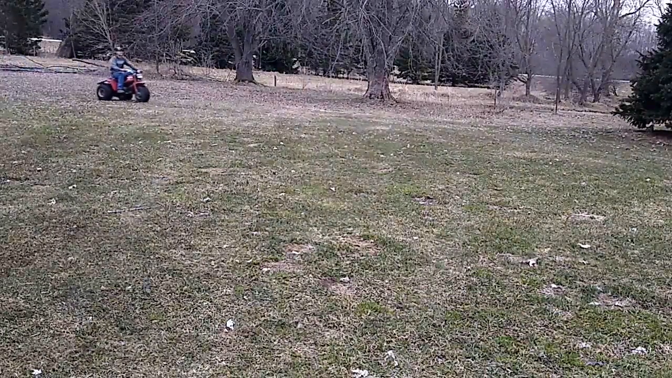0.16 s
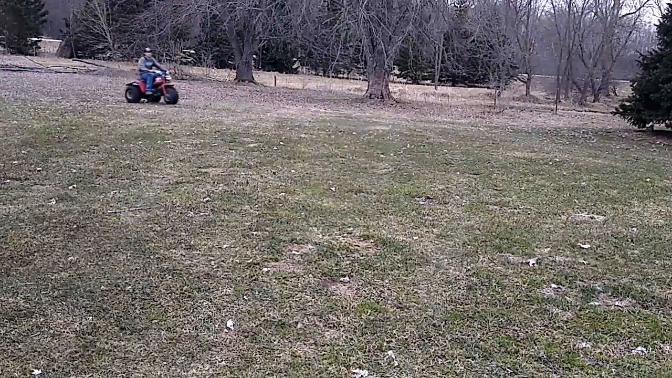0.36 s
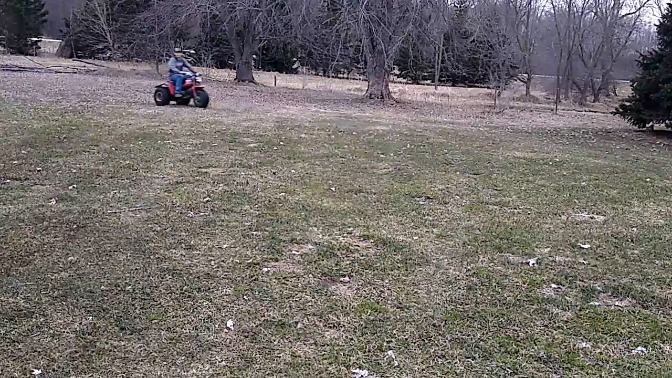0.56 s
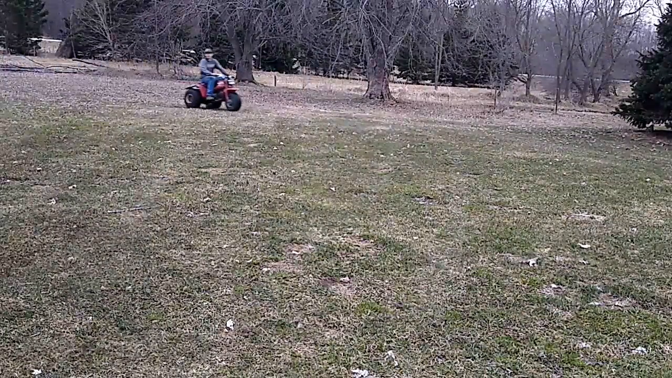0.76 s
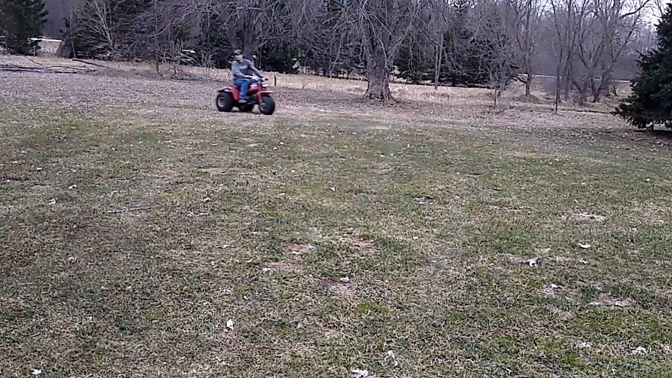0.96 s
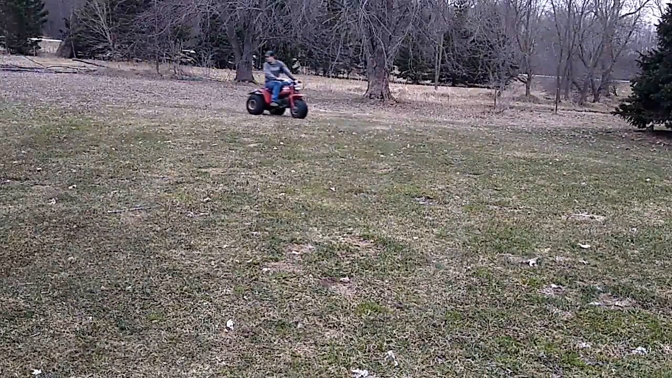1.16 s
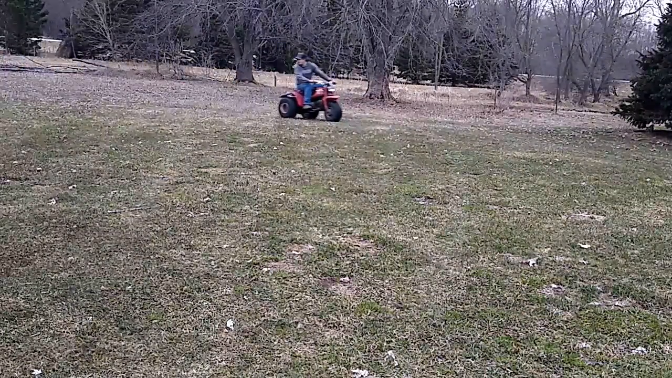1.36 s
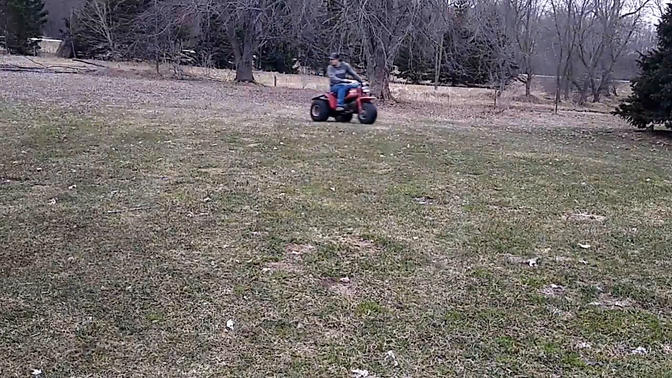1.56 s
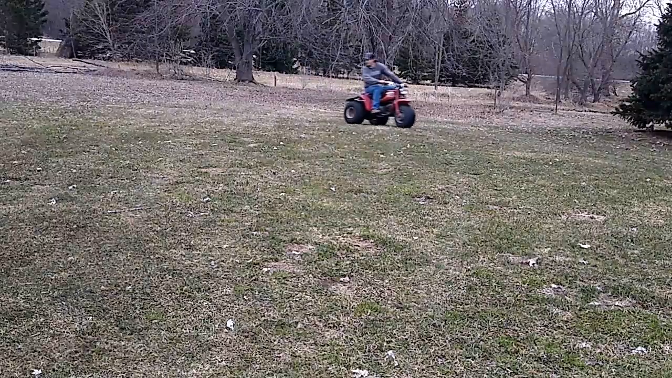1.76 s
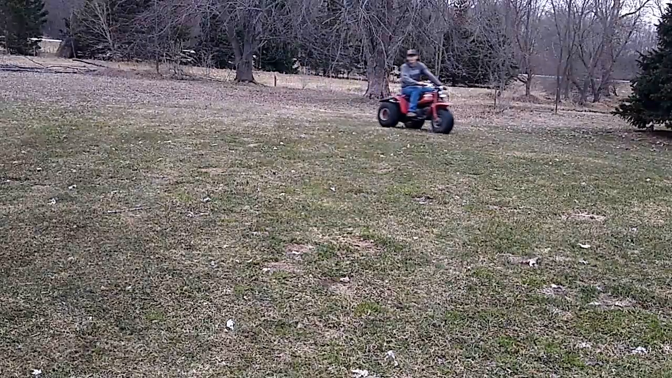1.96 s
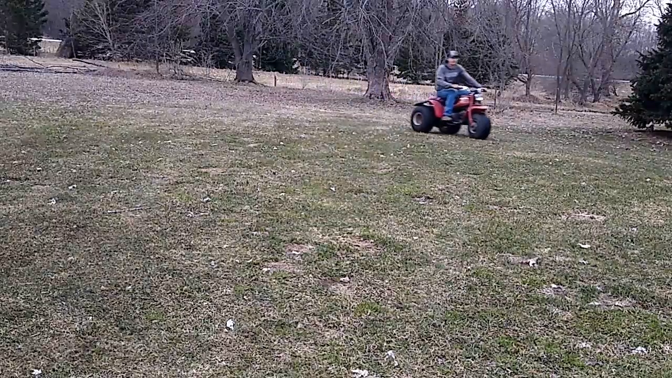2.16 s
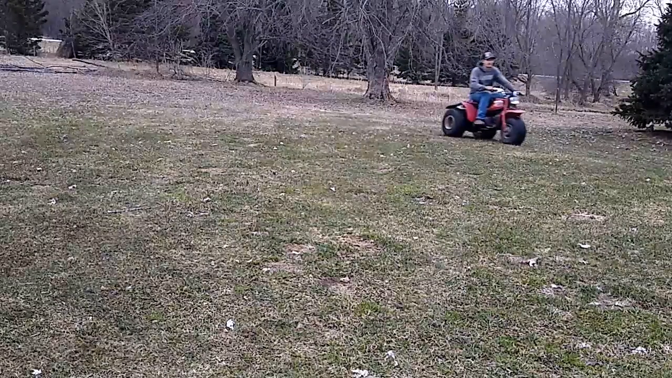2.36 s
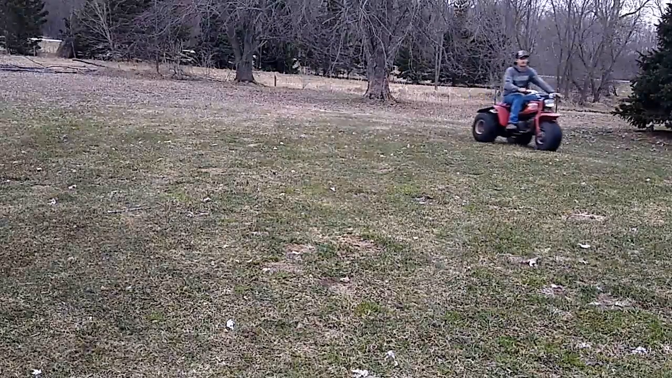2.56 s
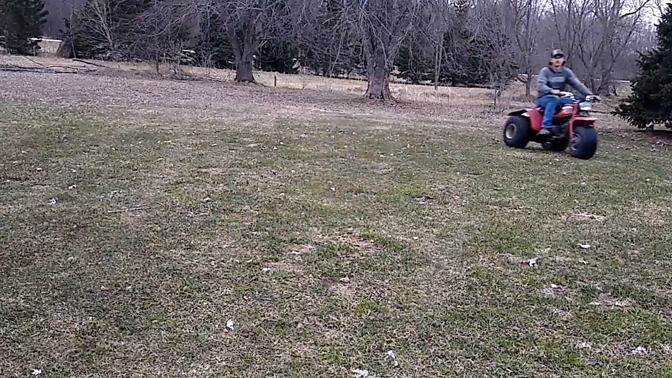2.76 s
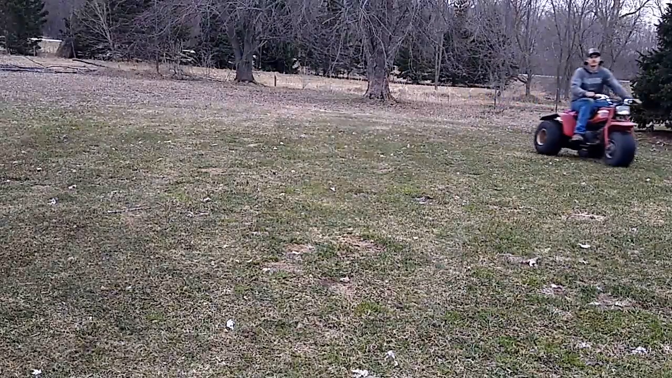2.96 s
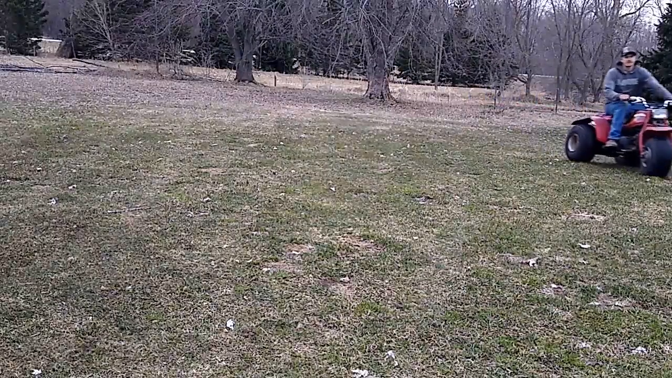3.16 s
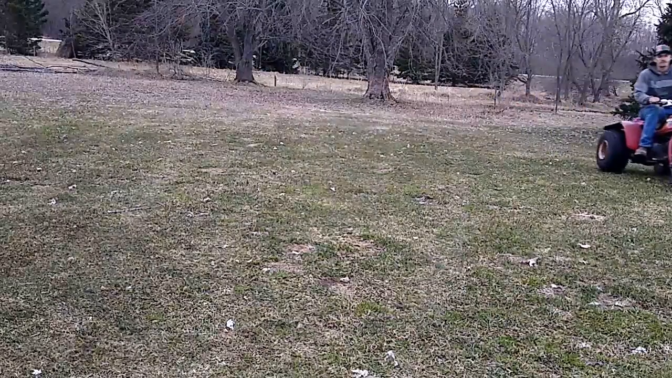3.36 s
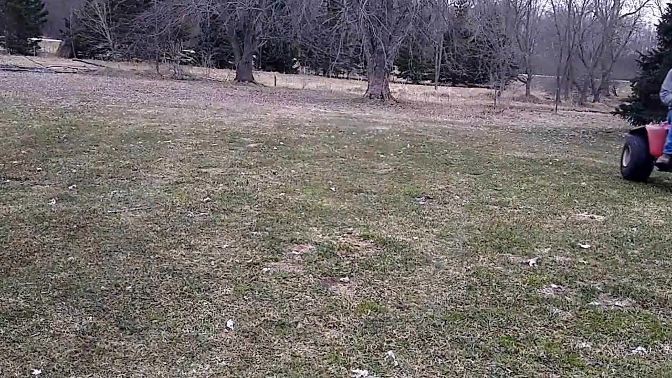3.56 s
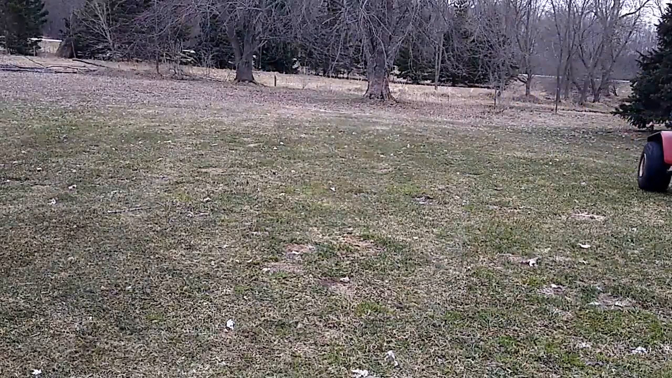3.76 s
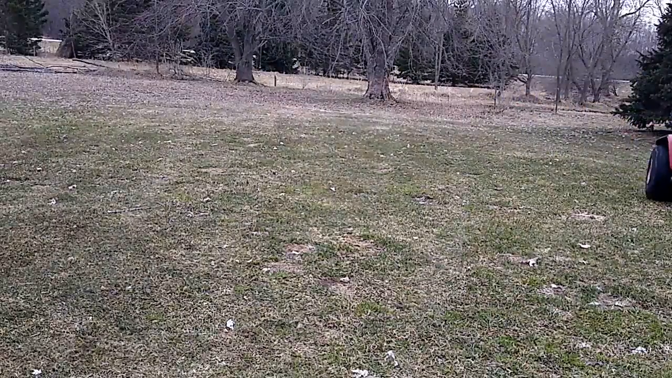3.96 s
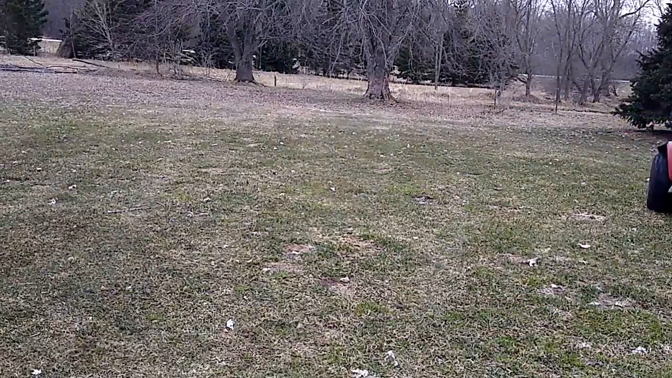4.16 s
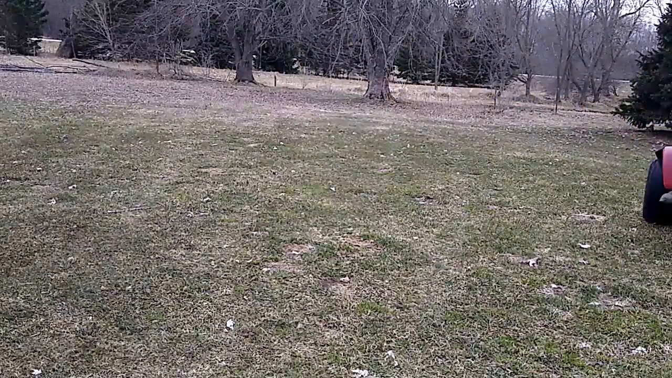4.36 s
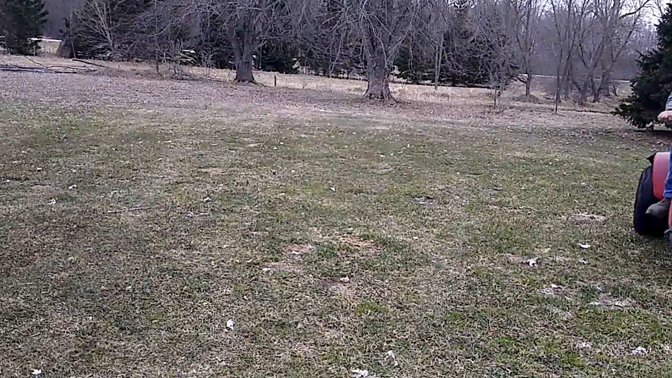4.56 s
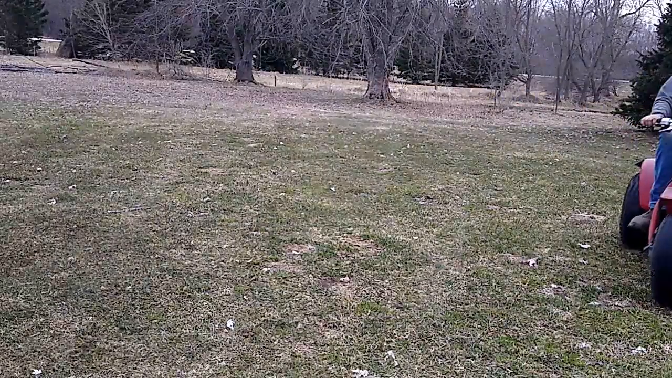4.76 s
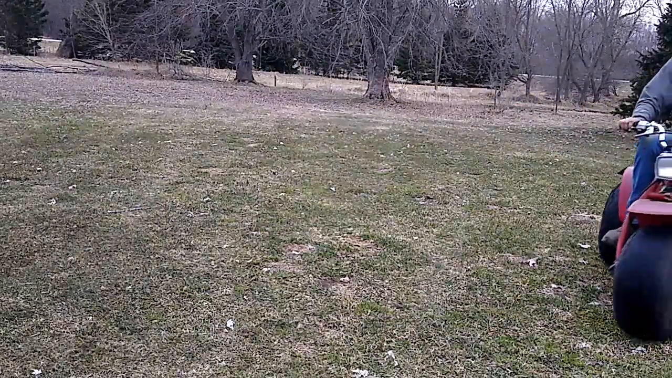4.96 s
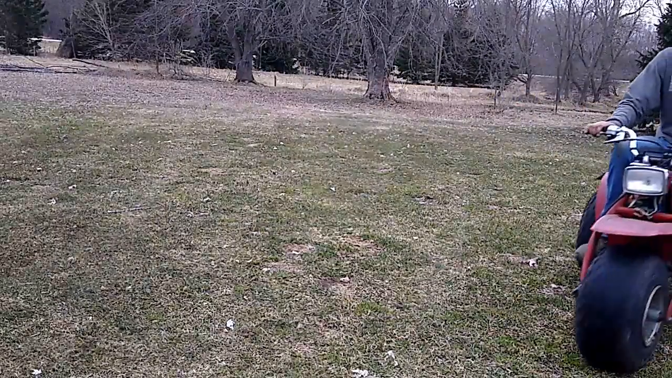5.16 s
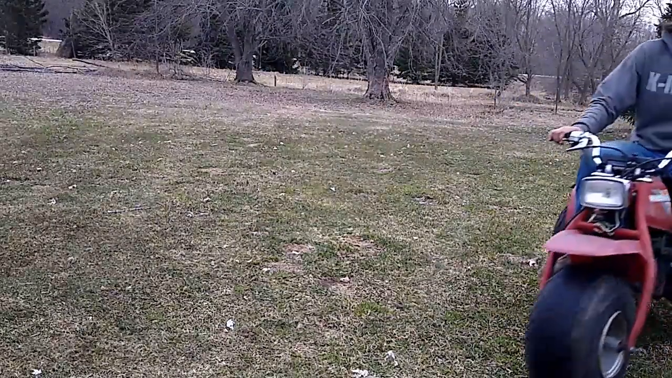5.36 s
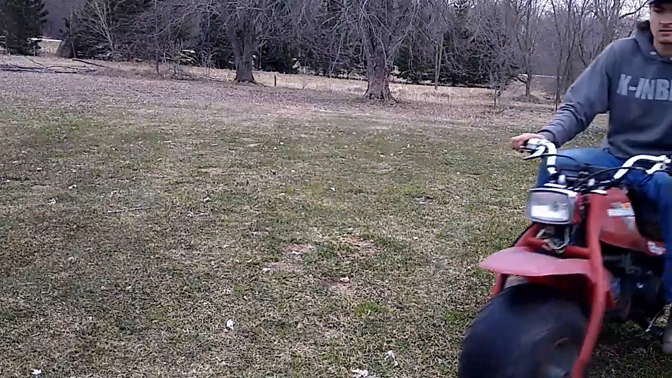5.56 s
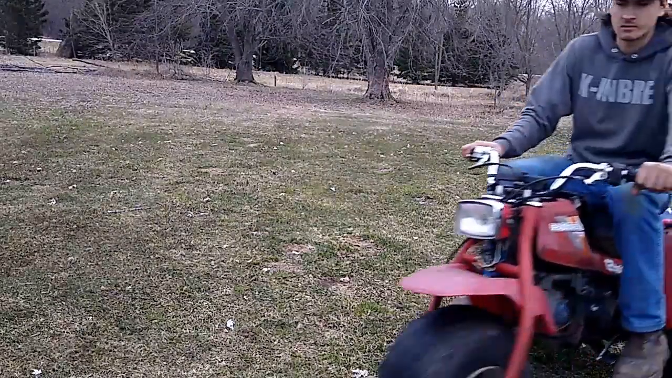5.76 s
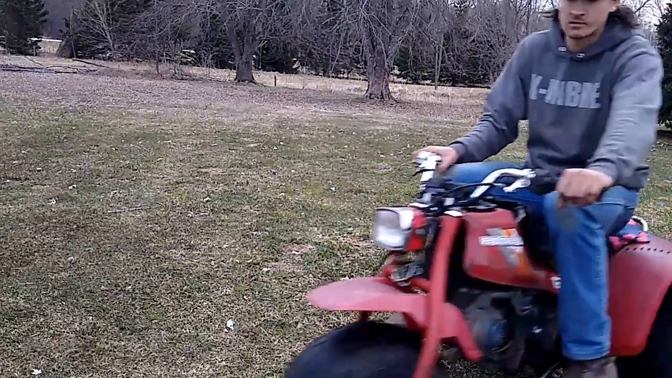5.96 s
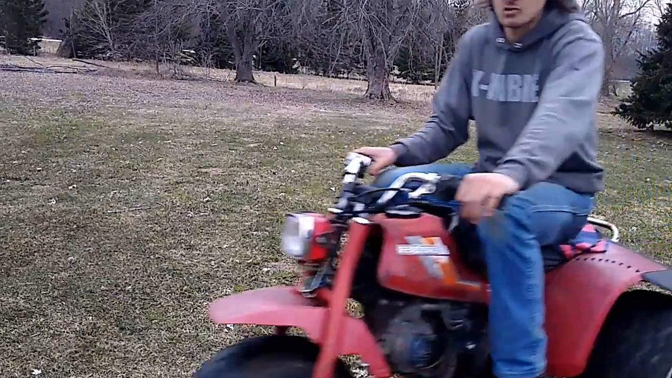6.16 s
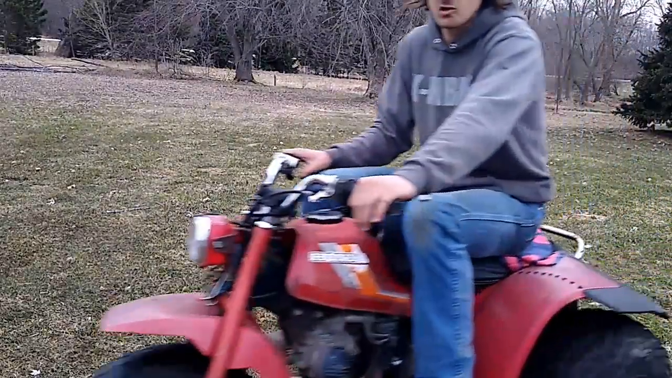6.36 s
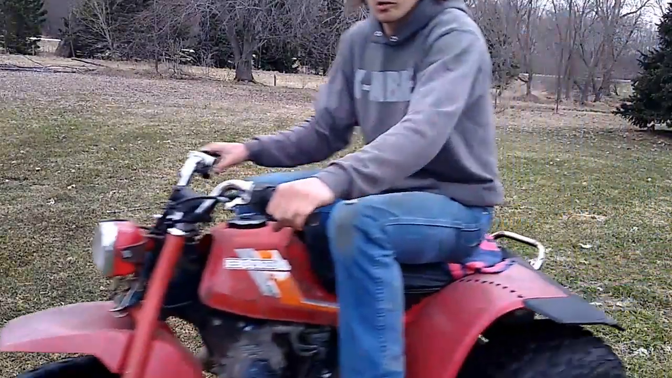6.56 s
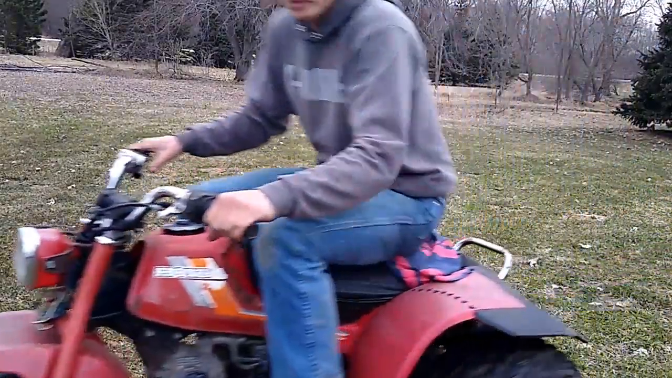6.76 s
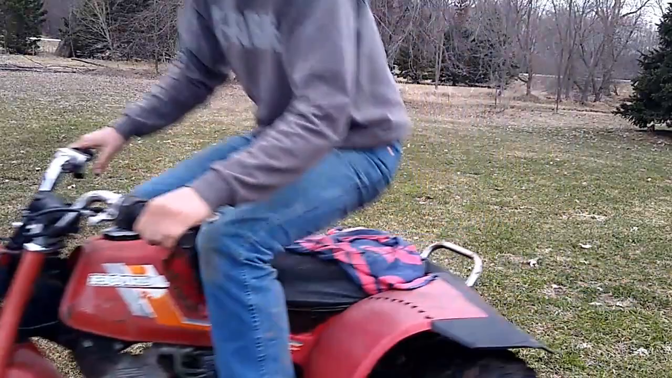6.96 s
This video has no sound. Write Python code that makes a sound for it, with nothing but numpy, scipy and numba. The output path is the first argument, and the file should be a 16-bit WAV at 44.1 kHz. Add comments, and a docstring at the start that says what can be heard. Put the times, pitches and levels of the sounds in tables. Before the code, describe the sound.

A three-wheeled all-terrain vehicle rides from left to right across an open lawn, its single-cylinder engine barking through short throttle blips with metallic ticking and a few knocks. It slows to a low chug as it turns on the right, then rolls back close past the microphone, growing louder. A loose panel clanks lightly near the end, over a faint low rumble of outdoor air.

```python
"""A single-cylinder four-stroke three-wheeler crosses a lawn from left to right, blipping the throttle.
Each firing rings the silencer; valve gear and chains rattle the finned case every cycle; the cylinder
knocks under load. Around 4 s the engine slows and the machine turns, then rolls back past a phone,
bumps striking a loose panel from 5.8 s. Throughout, low air rumble and a short outdoor scatter;
the phone's two microphone ports hear the machine at slightly different times."""
import sys
import numpy as np
from scipy import signal
from scipy.fft import rfft, irfft
from scipy.io import wavfile
from scipy.ndimage import uniform_filter1d, map_coordinates
from numba import njit

SR = 44100
rng = np.random.default_rng(int(sys.argv[2]) if len(sys.argv) > 2 else 0)


def persist_wave(psi):
    """Save psi, clipped to +-1, as 16-bit WAV."""
    counts = np.round(np.clip(psi, -1, 1) * 32767).astype(np.int16)
    wavfile.write(sys.argv[1], SR, np.atleast_2d(counts).T)


N = 308700
TIME_S = np.arange(N) / SR
BINS_HZ = np.maximum(np.fft.rfftfreq(N, 1 / SR), 1)

# Machine as it turns: (time [s], pipe pitch [Hz], pipe echo [0-1], relative intake gulp [dB],
# spread of its parts across the ports [us], facing [0 side on and far, 1 head on and near])
ASPECT = [(0, 191, 0.8, -61, 17, 0), (1, 226, 0.97, -4, 1.3, 0), (1.9, 183, 0.45, 0, 19, 0.14),
          (2.6, 182, 0.57, -8, 1.1, 0.075), (3.45, 189, 0.62, -33, 20, 0.42), (4.1, 177, 1, 4, 33, 0.72),
          (4.7, 150, 0.92, 1, 27, 0.94), (5.5, 151, 1, 9, 41, 0.82), (6.2, 153, 0.98, 4, 51, 0.77),
          (7, 156, 0.64, 2.5, 51, 0.61)]
# Loudness, throttle shut: (time [s], exhaust thump [dB], running gear [dB])
IDLE_LEVELS = [(0, -33, -32), (.6, -31, -30), (1.2, -30.5, -28.5), (1.8, -30, -28.5), (2.05, -32, -28),
               (2.3, -32, -28), (2.6, -31, -28.5), (3.0, -28.5, -28), (3.45, -30.5, -27.5),
               (3.62, -29, -30), (3.72, -34, -29.5), (3.82, -29.5, -28.5), (3.92, -36, -30.5),
               (4.01, -30, -31.5), (4.07, -38.5, -33), (4.28, -35, -32.5), (4.4, -33.5, -34.5),
               (4.6, -32.5, -31), (4.8, -31, -30.5), (5.5, -27, -25.5), (6.1, -25.5, -20.5),
               (6.65, -23.5, -16.5), (7, -24, -16)]
# Case resonances: (pitch [Hz], width [Hz], side on [dB], head on [dB])
CASE_MODES = [(1840, 390, -22, 2.5), (2643, 84, -12, 2), (3440, 220, -16, -6), (4015, 92, -8.5, -30),
              (4390, 45, -8.5, -13), (2860, 47, -46, 8), (3030, 3400, -16, -3.5)]
# Fin resonances: (pitch [Hz], width [Hz], side on [dB], head on [dB])
FIN_MODES = [(5066, 40, -1, 0), (5340, 85, -3, -2.5), (5680, 52, 0.5, -3), (6190, 32, 5, 7),
             (6970, 36, 2, -11), (7850, 180, -4.5, 0), (8860, 560, -13, 1.5), (9800, 120, -13, -7),
             (10430, 110, -10, -4), (11360, 440, -22.5, -3), (12000, 150, -6, 2), (13000, 330, -7, -5.5),
             (14000, 300, -17, -4)]


def undb(db):
    """dB to gain."""
    return 10 ** (np.asarray(db) / 20)


def unit(x):
    """Scale to rms 1."""
    return x / np.sqrt(np.mean(x ** 2))


def steady(x):
    """Divide out slow level changes."""
    return x / np.sqrt(uniform_filter1d(uniform_filter1d(x ** 2, size=6000), size=6000) + 1e-12)


def curves(table):
    """Each column after time, at every sample."""
    time_s, *columns = np.transpose(table)
    return [np.interp(TIME_S, time_s, column) for column in columns]


def walk(rate_hz, count=1):
    """Slewed random steps, spread near 1."""
    hold = int(SR / rate_hz)
    steps = np.repeat(rng.standard_normal((count, N // hold + 1)), hold, axis=1)
    return uniform_filter1d(steps, hold)[:, :N]


def ring(x, modes):
    """Parallel resonances: (pitch [Hz], width [Hz], level [dB])."""
    response = sum(undb(db) * 1j * BINS_HZ * width_hz / (hz ** 2 - BINS_HZ ** 2 + 1j * BINS_HZ * width_hz)
                   for hz, width_hz, db in modes)
    return irfft(rfft(x) * response, N)


def colour(x, shape):
    """Broad spectral shape: (frequency [Hz], level [dB])."""
    hz, db = np.transpose(shape)
    return irfft(rfft(x) * undb(np.interp(np.log(BINS_HZ), np.log(hz), db)), N)


@njit
def band(x, hz, width_hz):
    """State-variable band-pass, moving centre."""
    out, band_state, low_state = np.empty(len(x)), 0., 0.
    for i in range(len(x)):
        g, damping = np.tan(np.pi * hz[i] / SR), width_hz[i] / hz[i]
        v = (band_state + g * (x[i] - low_state)) / (1 + g * (g + damping))
        band_state, low_state = 2 * v - band_state, low_state + 2 * g * v
        out[i] = damping * v
    return out


def turned(apply_filter, x, table):
    """Blend side-on and head-on filters (last two columns) by facing."""
    facing = curves(ASPECT)[4]
    side_on, head_on = (unit(apply_filter(x, np.delete(table, k, axis=1))) for k in (-1, -2))
    return (1 - facing) * side_on + facing * head_on


def throttle(response_s=.061):
    """Throttle opening, smoothed by the engine's response time."""
    # (opens [s], shuts [s], opening [0-1])
    pulls = [(-.1, 0.992, 0.84), (1.291, 1.499, 0.8), (1.619, 1.877, 0.97), (2.27, 2.45, 0.24),
             (2.442, 2.62, 0.51), (2.618, 3.479, 0.83), (3.94, 3.985, 0.24), (4.09, 4.48, 0.16),
             (4.492, 4.727, 0.61), (4.693, 7.1, 0.28)]
    lever = sum(opening * ((TIME_S >= on_s) & (TIME_S < off_s)) for on_s, off_s, opening in pulls)
    return np.clip(uniform_filter1d(lever, int(response_s * SR)), 0, 1.2)


def puff(cycles, firing_hz, at_s, width_s, scatter_db):
    """One smooth gas push per cycle, at_s after firing, random size."""
    cycle = np.round(cycles - at_s * firing_hz)
    since_s = (cycles - cycle) / firing_hz - at_s
    size = undb(scatter_db * rng.standard_normal(int(cycles[-1]) + 3))[cycle.astype(int) + 1]
    return size * np.exp(-.5 * (since_s / width_s) ** 2)


def exhaust_thump(cycles, firing_hz):
    """Throttle open: sharp puff, echoing in the pipe. Shut: a suck, then a soft puff, weak echo."""
    # Silencer can, heard head on under load: (pitch [Hz], width [Hz], level [dB])
    can_mode = (74, 24, 3)
    pipe_hz, echo, gulp_db, _, facing = curves(ASPECT)
    load = np.clip(throttle() / .28, 0, 1)  # sharpest from 0.28 open
    width_s = .0018 - .00095 * load
    late_s = .00039 + .001 * (1 - load)
    suck = .54 * (1 - load) * puff(cycles, firing_hz, late_s - .0035, width_s, .83)
    blast = puff(cycles, firing_hz, late_s, width_s, .17) - suck
    reflection = echo * (.24 + .5 * load) * puff(cycles, firing_hz, late_s + 1 / pipe_hz, width_s, .73)
    gulp = undb(gulp_db - 8) * puff(cycles, firing_hz, .01466, .00061, .66)
    push = (blast + reflection - gulp) * (1 + .14 * walk(400)[0])
    boom = load * facing ** 2 * ring(blast, [can_mode])
    thump = band(push, hz=174 + 79 * load - 116 * facing, width_hz=160 + 244 * load)
    return steady(boom + thump + .034 * walk(250)[0])


def silencer_bark(cycles, firing_hz, jitter_s=.0004):
    """Two chambers in series: each bark swells briefly, then dies."""
    # First chamber: (pitch [Hz], width [Hz], side on [dB], head on [dB])
    chamber_modes = [(245.6, 22, -10.5, -2.5), (345, 27.5, 6, 3), (432.2, 74, 2.5, -10.5)]
    uneven = cycles + firing_hz * jitter_s * walk(25)[0]
    crack = puff(uneven, firing_hz, .0002, .0006, 1.2) + 1.1 * puff(uneven, firing_hz, .0047, .0006, 2.2)
    crack += .09 * rng.standard_normal(N)
    return steady(ring(turned(ring, crack, chamber_modes), [(408, 110, 0)]))


def exhaust(cycles, firing_hz):
    """Thump plus bark; the bark follows the throttle, nearly gone when shut and head on."""
    opening, facing = throttle(), curves(ASPECT)[4]
    level_db = curves(IDLE_LEVELS)[0] + 5 * opening
    bark_gain = undb(-4.5) * (opening + undb(-4 - 19.5 * facing))
    thump, bark = exhaust_thump(cycles, firing_hz), silencer_bark(cycles, firing_hz)
    return undb(level_db) * (thump + bark_gain * bark)


def ticks(cycles, rough_db, phases, widths, bursts_db):
    """Dense uneven ticks, bunched within the cycle. Rows: centre, front, rear."""
    gate = 1
    for phase, width, db in zip(phases, widths, bursts_db):
        cycle = np.round(cycles - phase)
        size = rng.exponential(size=int(cycles[-1]) + 2)[cycle.astype(int)] ** .3
        gate = gate + (undb(db) - 1) * np.exp(-.5 * ((cycles - phase - cycle) / width) ** 2) * size
    return gate * rng.standard_normal((3, N)) * undb(rough_db * walk(900, count=3))


def taps(cycles, per_cycle=6, rise_s=.0018, decay_s=.004, scatter_db=1.3, detune=.04):
    """Parts tap after each firing, each ringing one case or fin mode. Rows: centre, front, rear."""
    modes, facing = np.array(CASE_MODES[1:6] + FIN_MODES), curves(ASPECT)[4]
    out, t = np.zeros((3, N + 1500)), np.arange(1500) / SR
    for k, (when, note, size, place) in enumerate(rng.random((int(cycles[-1]) * per_cycle, 4))):
        phase = .16 + .22 * (2 * when - 1)
        i = min(np.searchsorted(cycles, k // per_cycle + phase), N - 1)
        mode_hz, _, side_db, head_db = modes[int(note * len(modes))]
        db = .55 * (side_db + facing[i] * (head_db - side_db)) - scatter_db * np.log(1 - size)
        hz = mode_hz * (1 + detune * (2 * (3 * place % 1) - 1))
        ping = np.sin(2 * np.pi * hz * t) * np.exp(-t / decay_s) * np.tanh(t / rise_s)
        out[int(3 * place), i:i + 1500] += undb(db) * ping
    return undb(2.5) * out[:, :N]


def running_gear(cycles):
    """Valves, chain and gears ring frame, case and fins; louder when near and under load."""
    # Noise bursts: (phase after firing [cycles], width [cycles], fins [dB], case [dB])
    bursts = [(0, 0.051, 4.5, 1.5), (.24, 0.023, 7, 2.5), (.49, 0.066, -3, -0.5), (.8, 0.048, 0, 3.5)]
    # Frame resonances: (pitch [Hz], width [Hz], side on [dB], head on [dB])
    frame_modes = [(540, 27.6, 15, 8), (643, 117, 17, 7), (750, 85, -51, 0), (855, 88, -43, 8),
                   (1020, 73, 2, 4.5)]
    # Hiss under the fins: (frequency [Hz], side on [dB], head on [dB])
    hiss_shape = [(2040, -23, -50), (4800, -9.5, -8.5), (6470, -3, -2.5), (8300, -2, -3), (10600, -3, -3),
                  (12500, -8, -4), (13600, -15, -8.5), (15400, -12.5, -9.5)]
    phases, widths, fins_db, clatter_db = np.transpose(bursts)
    frame_drive = ring(ticks(cycles, 5.1, phases, widths, 1.5 * clatter_db), [(700, 15000, 0)])
    frame = turned(ring, frame_drive, frame_modes)
    case = turned(ring, ticks(cycles, 1.9, phases, widths, clatter_db), CASE_MODES)
    fins = turned(ring, ticks(cycles, 8.9, phases, widths, fins_db), FIN_MODES)
    hiss = turned(colour, ticks(cycles, .79, phases, widths, fins_db), hiss_shape)
    treble = unit(undb(-3.5) * fins + hiss) + taps(cycles)
    idle_db, facing, opening = curves(IDLE_LEVELS)[1], curves(ASPECT)[4], throttle()
    frame_db = idle_db - 12.5 + 8.5 * facing + 3 * opening + .99 * walk(40)
    case_db = idle_db - 6 - 1.1 * facing + 7 * opening + 2.3 * walk(60)
    treble_db = idle_db + 2 * opening
    return frame * undb(frame_db) + case * undb(case_db) + treble * undb(treble_db)


def air_rumble(level_db=-37):
    """Low outdoor rumble, mostly alike at both ports."""
    # (frequency [Hz], relative density [dB])
    spectrum = [(20, 39), (30, 50), (50, 36), (100, 27), (300, 22), (1000, -29), (4000, -137)]
    mid, side = (unit(colour(rng.standard_normal(N), spectrum)) for _ in range(2))
    return undb(level_db + 2 * walk(3.4)) * (mid + .22 * side * np.array([[1], [-1]]))


def yard_scatter(x, gain_db=-13.5, t60_s=.22, gap_s=.004):
    """Ground, trunks and walls: a short dull tail, alike at both ports only in the bass."""
    t = np.arange(SR // 4) / SR
    tails = rng.standard_normal((2, len(t))) * (t > gap_s) * 10 ** (-3 * t / t60_s)
    dull = colour(x, [(60, -13.5), (300, 5), (2000, -7.5), (6000, -60), (20000, -60)])
    wide = colour(dull, [(100, -18), (1500, -2.5), (20000, 2)])
    mid, side = (signal.fftconvolve(feed, tail)[:N] / np.linalg.norm(tail)
                 for feed, tail in zip((dull, wide), tails))
    return undb(gain_db) * np.array([mid + side, mid - side])


def cylinder_knocks():
    """Knock under load: 5 ms cracks ring three case modes."""
    # (time [s], relative level [dB])
    knocks = [(0.045, 11), (0.078, 8), (0.105, 8), (0.19, 7), (0.274, 9), (0.304, 12), (0.36, 9),
              (0.441, 10), (0.553, 12), (0.612, 11), (0.828, 12), (0.857, 10), (0.886, 9), (1.429, 12.5),
              (1.673, 12), (1.701, 14), (1.731, 2), (1.76, 17), (1.7877, 12.5), (1.818, 9), (2.69, 9),
              (3.02, 7), (3.058, 8), (3.095, 8), (3.3917, 9)]
    cracks = np.zeros(N)
    for time_s, db in knocks:
        i = int(time_s * SR)
        cracks[i:i + 220] += undb(db) * rng.choice([-1, 1], size=220) * np.hanning(220)
    return undb(-8) * ring(cracks, np.array(CASE_MODES)[2:5, :3])


def loose_panel(rise_s=.00045, decay_s=.021):
    """Each bump briefly rings one note of the panel."""
    # (time [s], level [dB], pitch [Hz])
    bumps = [(5.765, -22, 556), (5.889, -29, 578), (6.234, -21.5, 867), (6.4, -33, 554), (6.507, -19, 868),
             (6.56, -21, 840), (6.673, -17, 663), (6.734, -24, 770), (6.826, -18.5, 766), (6.937, -19, 772),
             (6.984, -14, 794)]
    out, t = np.zeros(N + 3000), np.arange(3000) / SR
    envelope = (1 - np.exp(-t / rise_s)) * np.exp(-t / decay_s)
    for time_s, db, hz in bumps:
        i = int(time_s * SR)
        out[i:i + 3000] += undb(db) * np.sin(2 * np.pi * hz * t) * envelope
    return out[:N]


def ports(x, lag_us):
    """Left port lags right by lag_us; the phone's body shades the treble."""
    # Shading, left minus right: (lag [us], middle [dB], treble [dB], top [dB])
    shading = [(-170, .9, .9, 7.2), (0, .3, 0, 4.3), (230, -.7, -2.1, 2.9)]
    lags_us, *columns_db = np.transpose(shading)
    shade_db = np.array([np.interp(lag_us, lags_us, db) for db in columns_db])
    middle = colour(x, [(250, -30), (700, -1), (20000, -22)])
    treble = colour(x, [(1500, -38), (3500, -6), (20000, 17)])
    top = colour(x, [(6500, -35), (11000, 5.5), (20000, 0)])
    out = []
    for side in (1, -1):
        middle_gain, treble_gain, top_gain = undb(side * shade_db / 2)
        shaded = x - middle + middle_gain * (middle - treble)
        shaded = shaded + treble_gain * (treble - top) + top_gain * top
        read_at = np.arange(N) - side * lag_us * SR / 2e6
        out.append(map_coordinates(shaded, [read_at], order=3, mode="nearest"))
    return np.array(out)


def scene():
    """Engine and exhaust from the machine's middle, more running gear from either end."""
    # Engine speed: (time [s], firing rate [Hz])
    engine_speed = [(0, 34.181), (0.4, 35.95), (0.96, 36.708), (1.03, 32.695), (1.24, 31.876),
                    (1.32, 38.597), (1.43, 34.599), (1.52, 32.055), (1.75, 35.528), (1.84, 32.439),
                    (1.97, 27.953), (2.5, 29.067), (2.66, 27.301), (3.45, 26.596), (3.68, 21.652),
                    (3.98, 22.414), (4.15, 18.288), (4.42, 17.386), (4.7, 20.349), (4.95, 18.082),
                    (5.5, 18.767), (7, 18.696)]
    # Machine direction: (time [s], left port behind right [us])
    bearing = [(0, -172), (.4, -156), (1.2, -72), (2.4, 82), (3.3, 178), (3.8, 218), (4.5, 231), (5.1, 216),
               (5.5, 191), (5.8, 155), (6.1, 92), (6.7, -61), (7, -125)]
    (firing_hz,), (lag_us,) = curves(engine_speed), curves(bearing)
    jitter_s = .0002 * walk(20)[0]
    cycles = .15 + np.cumsum(firing_hz) / SR + firing_hz * jitter_s
    spread_us = curves(ASPECT)[3]
    centre, front, rear = running_gear(cycles)
    middle = exhaust(cycles, firing_hz) + .54 * centre + cylinder_knocks() + loose_panel()
    ends = ports(.36 * front, lag_us + spread_us) + ports(.39 * rear, lag_us - spread_us)
    return ports(middle, lag_us) + ends + yard_scatter(middle + front + rear) + air_rumble()


def record(dry):
    """The phone drops the deepest bass and cuts the top."""
    # (frequency [Hz], gain [dB])
    mic_response = [(20, -41), (40, -12.5), (70, -2.5), (110, -0.44), (20000, -1.5)]
    cutoff_hz = 15350
    lowpass = signal.ellip(10, .2, 70, cutoff_hz, fs=SR, output="sos")
    return signal.sosfilt(lowpass, colour(dry, mic_response))


dry = scene()
out = record(dry)
persist_wave(out)
```